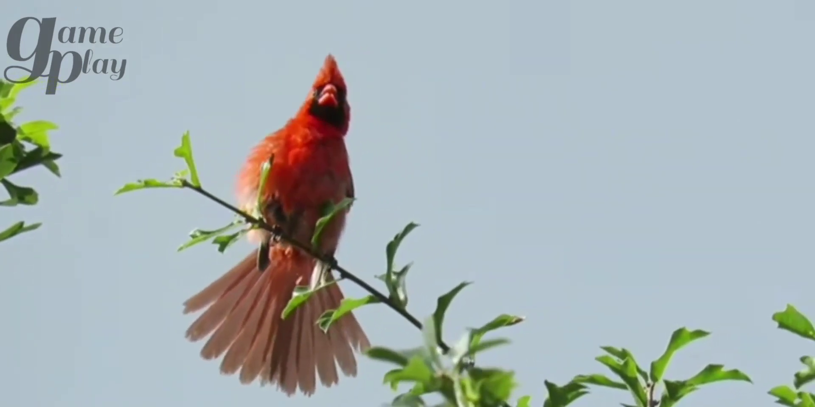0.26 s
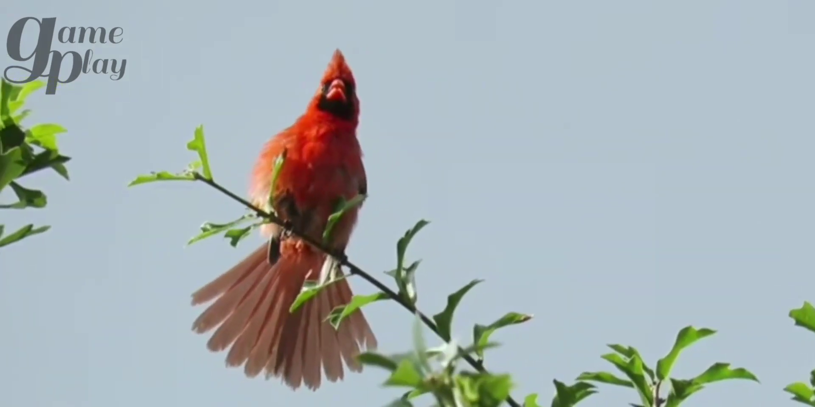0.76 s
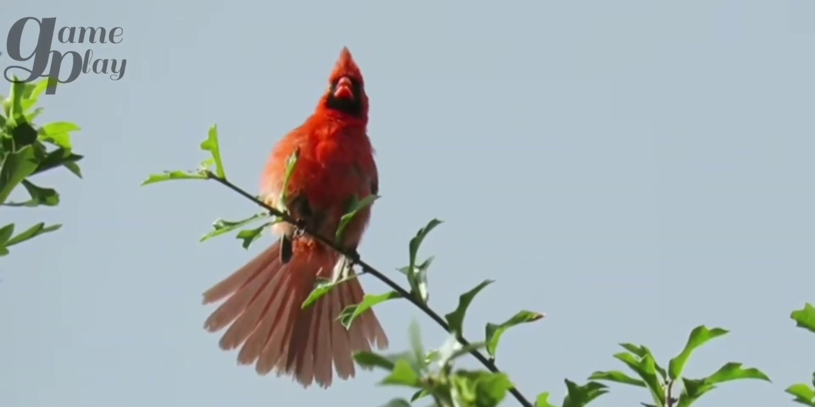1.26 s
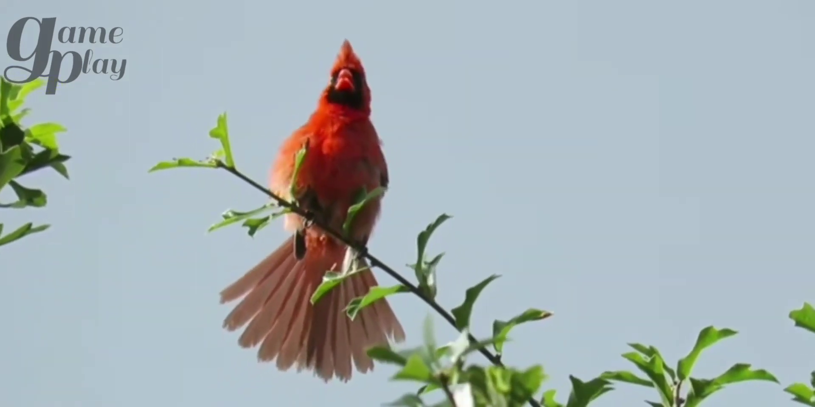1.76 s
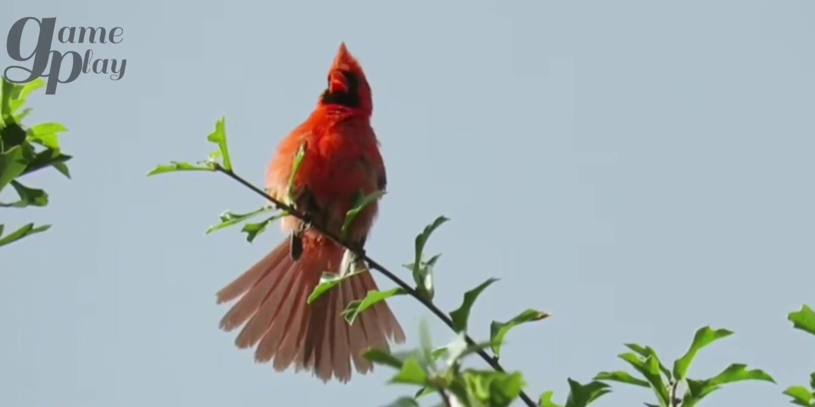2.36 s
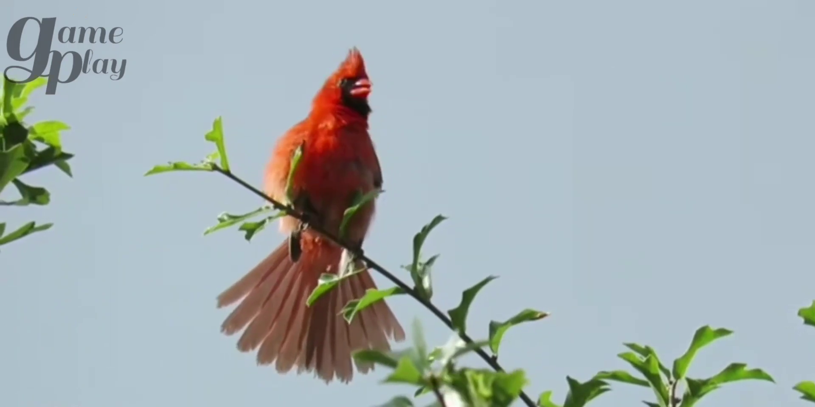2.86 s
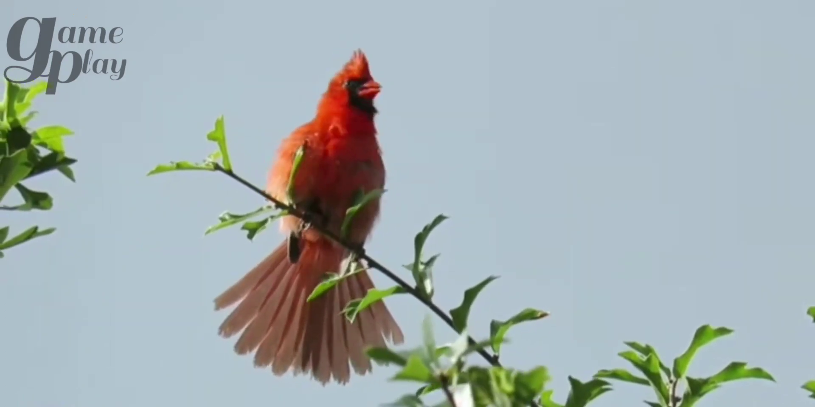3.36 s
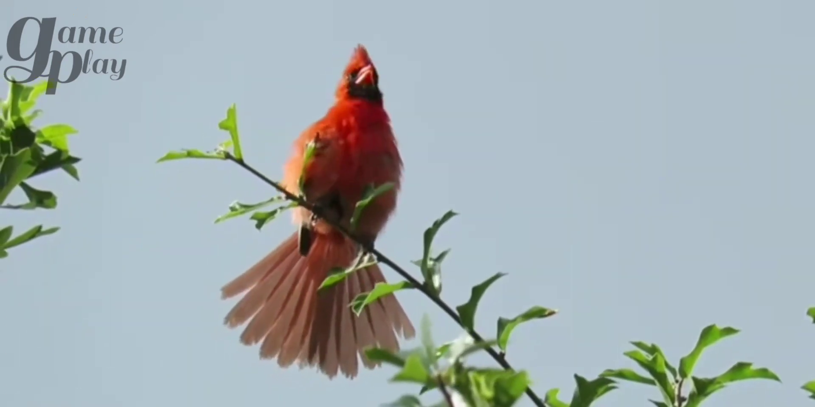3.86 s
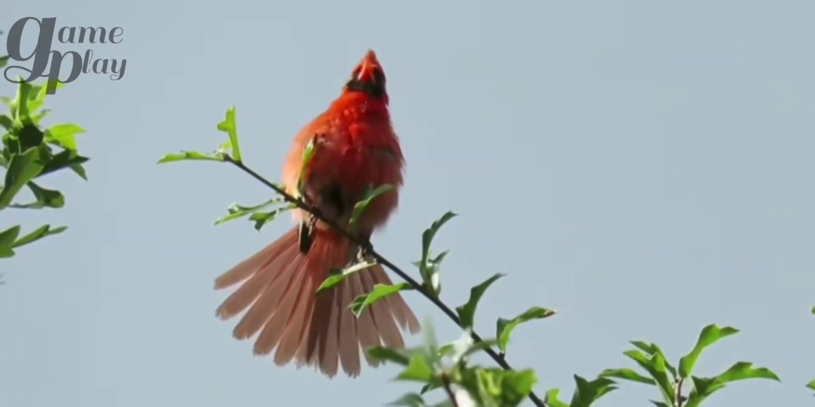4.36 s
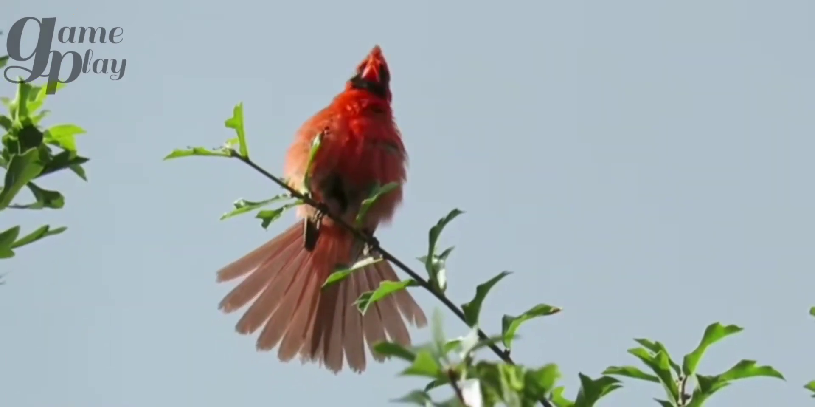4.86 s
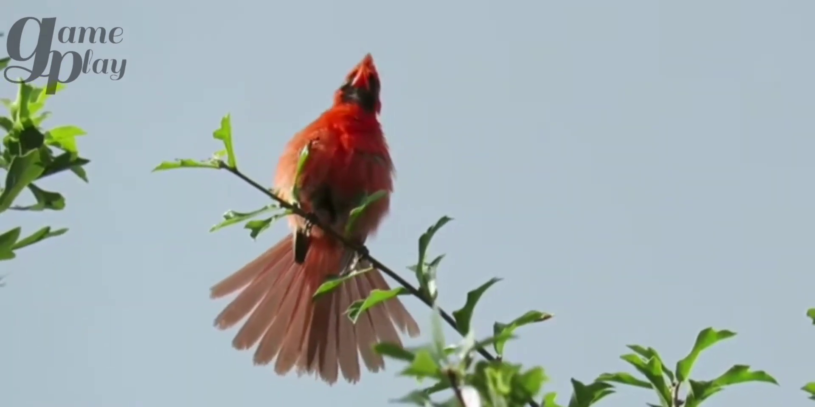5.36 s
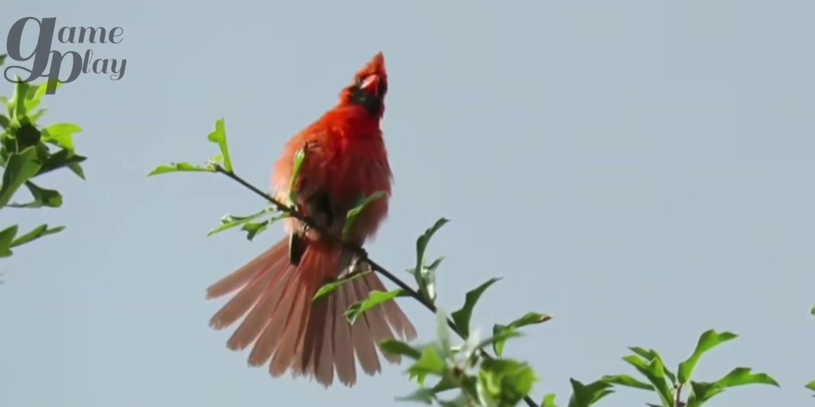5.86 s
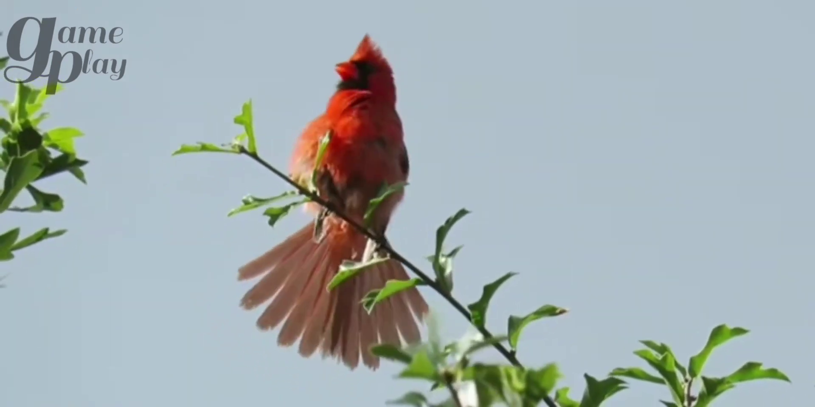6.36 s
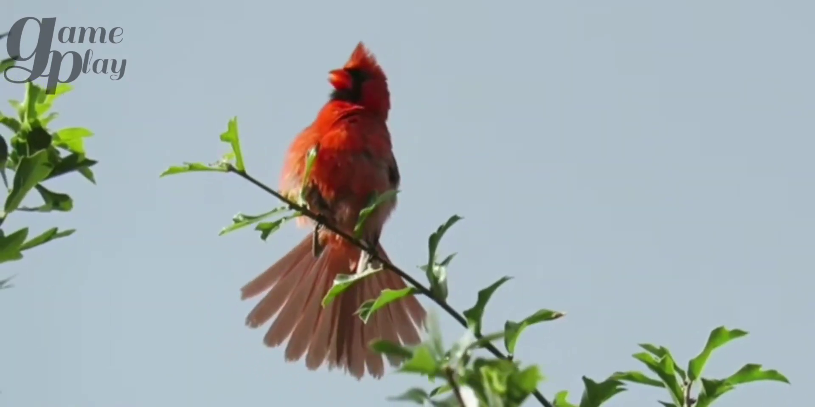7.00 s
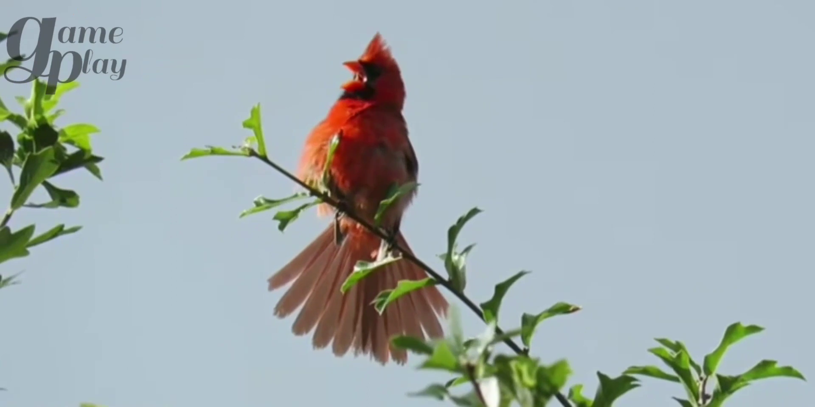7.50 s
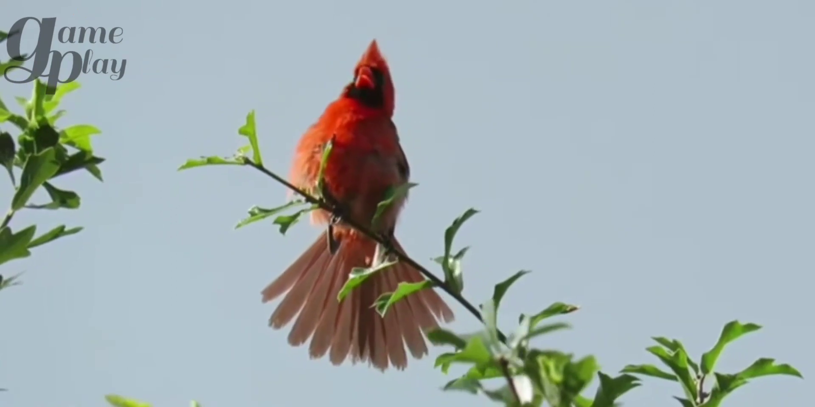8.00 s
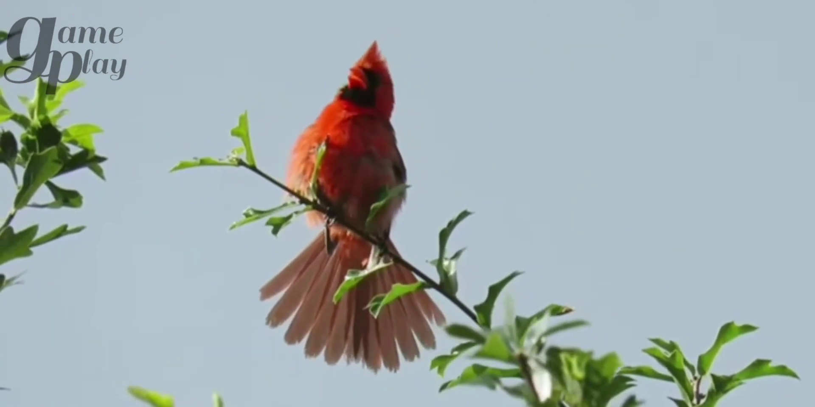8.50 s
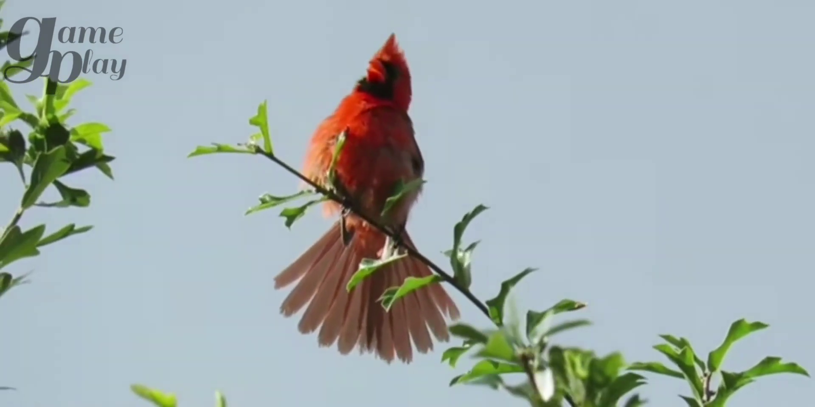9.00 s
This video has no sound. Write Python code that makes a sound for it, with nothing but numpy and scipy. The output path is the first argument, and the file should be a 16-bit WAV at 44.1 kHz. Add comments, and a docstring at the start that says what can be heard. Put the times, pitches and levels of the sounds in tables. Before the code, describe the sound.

A cardinal repeats quick chirps and down-slurred whistles from a treetop amid constant shrill insect hiss; a faint trill and distant cardinal follow.

```python
"""Throughout, traffic rumbles far off, air stirs the leaves (all coloured noise) and cicadas buzz (ringing clicks).
Early on, other birds whistle: gliding sines. Then a cardinal sings from a treetop on a summer day: quick high
chirps and long falling slurs, both sines, echoed by the trees; the ground echoes its slurs, branches its chirps.
Meanwhile a far animal trills (pulsed noise in a throat) and a far cardinal answers; late on, birds whistle again.
Both channels are the same, as from a mono microphone."""
import sys
import numpy as np
from scipy import signal
from scipy.fft import rfft, irfft, next_fast_len
from scipy.io import wavfile
from scipy.ndimage import uniform_filter1d, map_coordinates

SR = 44100
rng = np.random.default_rng(int(sys.argv[2]) if len(sys.argv) > 2 else 0)


def generate_wav(signal):
    """Clip the signal to [-1, 1] and save it as 16-bit WAV at the path in sys.argv[1]."""
    frames = np.transpose(np.atleast_2d(signal))
    scaled = np.clip(frames, -1, 1) * 32767
    pcm = np.round(scaled).astype(np.int16)
    wavfile.write(sys.argv[1], SR, pcm)


N = 407484  # length in samples


def amp(db):
    """Turns dB into a plain factor."""
    return 10 ** (np.asarray(db) / 20)


def unit(x):
    """Scales x to an rms of 1."""
    return x / np.sqrt(np.mean(x ** 2) + 1e-20)


def along(points, hz):
    """Reads a curve of (Hz, value) points on a log pitch axis."""
    f, v = np.transpose(points)
    return np.interp(np.log(hz + 1), np.log(f + 1), v)


def wobble(rate):
    """A smooth random curve with rate random points a second."""
    points = rng.standard_normal(int(N * rate / SR) + 4)
    return map_coordinates(points, [np.arange(N) * rate / SR])


def spell(start, stop, edge, db):
    """A level change in dB that sets in, holds and goes back; times in seconds."""
    t = np.arange(N) / SR
    return db * np.clip(np.minimum(t - start, stop - t) / edge + .5, 0, 1)


def filtered(x, response):
    """Multiplies the spectrum of x by a response that depends on frequency."""
    m = next_fast_len(N + SR // 2)
    return irfft(rfft(x, m) * response(np.fft.rfftfreq(m, 1 / SR)), m)[..., :N]


def resonances(modes):
    """Response of a few resonances, added with alternating sign; modes are (Hz, width in Hz, dB)."""
    def response(f):
        total = 0
        for k, (center, width, db) in enumerate(modes):
            ring = 1j * f * width / (center * center - f * f + 1j * f * width)
            total = total + (-1) ** k * amp(db) * ring
        return total
    return response


def patchy(x, patchy_db):
    """Gives x patches of random gain in time and frequency."""
    z = signal.stft(x, nperseg=512)[2]
    field = uniform_filter1d(rng.standard_normal(z.shape), size=3, axis=0)
    field = uniform_filter1d(field, size=5, axis=1)
    return signal.istft(z * amp(patchy_db * unit(field)), nperseg=512)[1][:N]


def rush(spectrum, patchy_db):
    """Patchy noise of rms 1, coloured by a curve of (Hz, dB)."""
    noise = patchy(rng.standard_normal(N), patchy_db)
    return unit(filtered(noise, lambda hz: amp(along(spectrum, hz))))


def add(track, s, hz, db):
    """Adds a sine at s seconds, its pitch and rms level given for every sample."""
    phase = 2 * np.pi * np.cumsum(hz) / SR
    track[round(s * SR):][:len(hz)] += np.sqrt(2) * amp(db) * np.sin(phase)


def traffic():
    """Far traffic is a deep rumble and a higher road noise, both coloured noise."""
    # Colour of the rumble. Each row: frequency in Hz, relative level in dB per Hz.
    rumble_color = [(13, -49), (22, -34), (60, -6), (114, 0), (156, -2.5), (230, -8.5), (275, -14),
                    (330, -14.5), (430, -40), (730, -120)]
    # Colour of the road noise. Each row: frequency in Hz, relative level in dB per Hz.
    road_color = [(40, -26), (130, -12.5), (270, -6), (400, -4.5), (620, -2), (800, -2.5), (950, -4.5),
                  (1150, -10), (1600, -14.5), (2100, -21.5), (3500, -120)]
    # the rumble drops for about a second
    rumble_db = -48 + spell(6.24, 7.28, edge=.06, db=-7)
    road_db = -52 + 0.214 * np.arange(N) / SR  # rises slowly, in dB per second
    rumble = amp(rumble_db) * rush(rumble_color, patchy_db=0.6)
    return rumble + amp(road_db) * rush(road_color, patchy_db=1.75)


def engines():
    """Notes of far passing engines: sines with soft ends and a slightly drifting pitch."""
    # Each row: start in seconds, end in seconds, middle pitch in Hz, level in dB.
    notes = [(.4, 1.2, 108.2, -53.5), (2.3, 4.3, 588, -63.5), (3.6, 4.14, 109.8, -53),
             (4.1, 4.95, 219.3, -53.5), (5, 6.6, 609, -61.5), (5.7, 6.046, 400.1, -59.5),
             (6.3, 7.4, 515, -65), (7.45, 8, 215, -56), (7.9, 8.9, 110, -53.5), (7.2, 9.2, 667, -66)]
    track, drift = np.zeros(N), wobble(6)
    for start, stop, hz, db in notes:
        u = np.linspace(0, 1, round((stop - start) * SR))
        swell_db = 20 * np.log10(np.sin(np.pi * u) ** 0.21 + 1e-4)
        drifting_hz = hz * (1 + 0.00437 * drift[round(start * SR):][:len(u)])
        add(track, start, drifting_hz, db + swell_db)
    return track


def leaves():
    """Air in the leaves makes patchy noise that slowly changes in level."""
    # Strength over time. Each row: time in seconds, level in dB.
    strength = [(0, -59.5), (3, -62), (5, -58), (8, -59), (9.24, -59.5)]
    # Colour of the rustle. Each row: frequency in Hz, relative level in dB per Hz.
    leaf_color = [(800, -49), (1300, -1.5), (1700, -9), (2200, -4.5), (2600, -4.5), (3000, -6.5),
                  (4000, -9), (5000, -10.5), (6000, -7), (7000, -4.5), (9000, -46), (15000, -120)]
    s, db = np.transpose(strength)
    level_db = np.interp(np.arange(N) / SR, s, db)
    return amp(level_db) * rush(leaf_color, patchy_db=3.5)


def cicadas():
    """Countless clicks of the tymbals (drum skins in the body) ring one main resonance."""
    # Resonances before cubing. Each row: frequency in Hz, width in Hz, relative level in dB.
    tymbal = [(8068, 1296, 1.5), (7090, 480, -18)]
    clicks = rng.standard_normal(N) * (rng.random(N) < .3)
    ring = resonances(tymbal)
    # cubed for the drum, the air sac and the spread of sizes
    buzz = unit(filtered(patchy(clicks, patchy_db=1.55), lambda f: ring(f) ** 3))
    level_db = -36 + 0.23 * wobble(12) + 0.56 * wobble(28)
    return amp(level_db) * buzz


def hissing_insects():
    """Other insects hiss above the cicadas: a broad noise and a thin one."""
    # Colour of the broad hiss. Each row: frequency in Hz, relative level in dB per Hz.
    broad_color = [(7000, -39), (8800, -22), (9150, -17), (9400, 0), (9850, -2.5), (10300, 0), (12000, 0),
                   (13400, -3), (14400, -10), (15000, -20), (15700, -12.5)]
    # Colour of the thin hiss. Each row: frequency in Hz, relative level in dB per Hz.
    thin_color = [(12800, -26), (13500, -21), (13900, 8), (14400, -10), (15000, -15)]
    broad_db = -43.5 + 0.11 * wobble(18) + 0.22 * wobble(30)
    thin_db = -61.5 + spell(4.9, 8.55, edge=.6, db=6)  # stronger for a while
    broad = amp(broad_db) * rush(broad_color, patchy_db=1.75)
    return broad + amp(thin_db) * rush(thin_color, patchy_db=3.0)


def trill():
    """A far animal puffs noise through a small throat, ever slower, blurred by distance."""
    # Throat resonances. Each row: frequency in Hz, width in Hz, relative level in dB.
    throat = [(2410, 250, 9), (1880, 170, -14), (2980, 600, -10), (3830, 130, 4)]
    count_s = 4.575  # a puff early in the swell, from which the slowing is counted
    full_s, end_s = 5.2, 7.24  # full strength, start of the fade
    fast_per_s, slow_per_s, tires_s = 24.6, 16.5, .69  # the puff rate relaxes from fast to slow
    t = np.arange(N) / SR
    tiring = tires_s * (1 - np.exp(np.minimum(count_s - t, 1) / tires_s))
    beat = slow_per_s * (t - count_s) + (fast_per_s - slow_per_s) * tiring
    puffs = (.5 + .5 * np.cos(2 * np.pi * beat)) ** 2.6
    puffs = puffs * amp(1.6 * wobble(14)) + 0.08  # the blur fills the gaps a little
    # rises by 13 dB per second, then sags by .5 dB per second
    level_db = -60 + np.minimum(13 * (t - full_s), .5 * (full_s - t))
    level_db = level_db - 60 * np.maximum(t - end_s, 0) / 0.44  # fades by 60 dB in 0.44 s
    return amp(level_db) * unit(filtered(puffs * rng.standard_normal(N), resonances(throat)))


def whistles():
    """Other birds: soft-edged gliding notes that flutter on their long way through the leaves."""
    # Each row: start in seconds, length in seconds, first pitch in Hz, last pitch in Hz,
    # level in dB before the flutter.
    notes = [(1.762, .05, 2956, 2930, -68), (1.835, 0.051, 2957, 2920, -63), (3.0, .12, 2720, 2640, -70),
             (7.762, .045, 2684, 2760, -57), (7.805, 0.17, 2610, 2590, -63.5),
             (7.932, 0.076, 2670, 2675, -52.5), (7.942, 0.105, 2500, 2590, -58),
             (8.002, 0.041, 2620, 2554, -46.5), (8.03, .027, 2620, 2360, -52),
             (8.062, .07, 2600, 2620, -70)]
    track = np.zeros(N)
    for s, length, first_hz, last_hz, db in notes:
        u = np.linspace(0, 1, round(length * SR))
        edge_db = 20 * np.log10(np.sin(np.pi * u) ** .5 + 1e-4)
        add(track, s, first_hz + (last_hz - first_hz) * u, db + edge_db)
    return track * amp(3.3 * wobble(110))


def answer():
    """A far cardinal with the same kind of syllable, wavering over the distance."""
    return (chirps("far", swell_db=3.5) + slurs("far")) * amp(3.5 * wobble(90))


def chirps(singer, swell_db):
    """One side of the syrinx (voice organ): plunge, hold with a brief dip, level change and drop."""
    # Each row: start in seconds, level in dB before shaping, held pitch in Hz, height of the plunge
    # above it in Hz, attack in seconds, time of the dip after the start in seconds, singer.
    notes = [(3.337, -50.5, 3510, 2, 0.019, .0215, "near"), (3.799, -41.5, 3455, 598, .004, 0.011, "near"),
             (4.225, -39.5, 3460, 501, 0.0045, 0.019, "near"),
             (4.662, -36.5, 3400, 650, 0.0065, 0.015, "near"),
             (5.078, -36.5, 3450, 800, .005, 0.018, "near"),
             (5.49, -38.5, 3430, 749.5, .004, 0.017, "near"),
             (5.885, -36.5, 3526, 900, .008, 0.023, "near"), (6.52, -63, 3420, 300, .006, .02, "far"),
             (6.94, -61, 3420, 298.5, .006, 0.023, "far"), (7.348, -58, 3420, 301.5, .006, 0.016, "far")]
    plunge_s, sag_hz_per_s = .0022, 2000  # settles on the held pitch, which sags a little
    drop_s, drop_hz_per_s = .0205, 23000  # then the pitch drops away
    track, t = np.zeros(N), np.arange(-.03, .05, 1 / SR)
    for s, db, held_hz, plunge_hz, attack, dip, who in notes:
        if who != singer:
            continue
        above_hz = plunge_hz * np.exp(np.minimum(-t / plunge_s, 2))
        hz = held_hz + above_hz - sag_hz_per_s * np.maximum(t, 0)
        hz = hz - drop_hz_per_s * np.maximum(t - drop_s, 0)
        attack_db = 15 * np.minimum(t / attack - .5, 0)
        release_db = -60 * np.maximum(t - .032, 0) / .014  # 60 dB fade in .014 s
        # the level swells (or fades) early in the drop
        change_db = swell_db * np.exp(-((t - 0.023) / 0.0039) ** 2)
        dip_db = -13 * np.exp(-((t - dip) / 0.0023) ** 2)
        height_db = -6 * above_hz / 1000  # fainter the higher above the held pitch
        add(track, s + t[0], hz, db + attack_db + release_db + change_db + dip_db + height_db)
    return track


def slurs(singer):
    """The other side of the syrinx: a steady fall that weakens as it sinks; some break off early."""
    # Each row: start in seconds, level in dB before shaping, fall in octaves per second, time of
    # breaking off in seconds, overtone level in dB before the bill acts, singer.
    notes = [(3.388, -52, 2.3, .128, -9, "near"), (3.854, -45, 2.85, .13, -29.5, "near"),
             (4.275, -42.5, 3.0, .2, -34, "near"), (4.711, -40.5, 3.07, .21, -34, "near"),
             (5.129, -39.5, 3.2, 0.19, -34, "near"), (5.537, -39, 3.25, 0.2, -30, "near"),
             (5.932, -39, 3.2, 0.135, -36, "near"), (6.57, -62, 3.4, .1, -40, "far"),
             (7.0, -63, 4.2, .11, -40, "far"), (7.41, -61.5, 3.9, 0.058, -38, "far")]
    first_hz, hook_hz, hook_s = 2150, 90.4, 0.00417  # a short hook leads into the fall from above
    bill_hz, bill_width_hz = 3600, 350  # the open bill favours overtones near here
    track, t = np.zeros(N), np.arange(-.008, .27, 1 / SR)
    for s, db, fall, cut, overtone_db, who in notes:
        if who != singer:
            continue
        hz = first_hz * 2 ** (-fall * t) + hook_hz * np.exp(-t / hook_s)
        # the voice thins out below 1850 Hz by 44 dB per octave, 16 dB at most
        weak_db = np.clip(44 * np.log2(hz / 1850), -16, 0)
        attack_db = 15 * np.minimum(t / 0.0027 - 1, 0)
        release_db = -60 * np.maximum(t - cut, 0) / 0.016  # 60 dB fade in 0.016 s
        level_db = db + weak_db + attack_db + release_db
        bill_db = -6 * ((2 * hz - bill_hz) / bill_width_hz) ** 2
        add(track, s + t[0], hz, level_db)
        add(track, s + t[0], 2 * hz, level_db + overtone_db + bill_db)
    return track


def branches(x):
    """Nearby branches throw back weak copies within 25 ms, in a new spray every 0.4 s."""
    out, step = np.zeros(N + SR), round(.4 * SR)
    for start in range(round(.1 * SR), N, step):
        spray = np.zeros(SR // 20)
        delays_s = rng.uniform(.002, .025, size=9)
        spray[(delays_s * SR).astype(int)] = rng.standard_normal(9)
        part = signal.fftconvolve(x[start:start + step], spray)
        out[start:][:len(part)] += part
    return out[:N]


def cardinal():
    """The near singer: slurs by way of the ground, chirps by way of branches; and what the trees get."""
    ground_s = .0043  # extra travel time by way of the ground
    high, low = chirps("near", swell_db=7), slurs("near")
    aside = chirps("near", swell_db=-10)  # toward the trees the drop fades instead of swelling
    # the copy off the ground weakens some pitches, so each slur dips and swells as it falls
    grounded = filtered(low, lambda f: 1 + 0.57 * np.exp(-2j * np.pi * f * ground_s))
    high = high + amp(-20) * branches(aside)
    # air in motion makes the level flutter
    near = high * amp(2.0 * wobble(160)) + grounded * amp(.8 * wobble(60))
    return near, aside + amp(-6) * low


def trees(x):
    """Tree crowns scatter sound: each frequency dies at its own speed; moving leaves change the tail."""
    # Each row: frequency in Hz, time to fade by 60 dB in seconds.
    fade_times = [(1200, 0.41), (2200, 0.9), (3400, 0.47), (5000, 0.78)]
    wet, step = np.zeros(N + SR), SR // 5  # a new tail every 0.2 s
    for start in range(0, N, step):
        piece = x[start:start + step]
        noise = rng.standard_normal(SR // 2)
        if np.abs(piece).max() < 1e-5:  # nothing to echo
            continue
        hz, t, z = signal.stft(noise, SR, nperseg=256)
        # high pitches scatter more, by 4.3 dB per octave
        tilt_db = 4.3 * np.log2(np.clip(hz, 500, 5000) / 5000)[:, None]
        fade_db = -60 * t / along(fade_times, hz)[:, None]
        tail = signal.istft(z * amp(tilt_db + fade_db), SR, nperseg=256)[1]
        part = signal.fftconvolve(piece, tail / np.linalg.norm(tail))
        wet[start + 300:][:len(part)] += part  # 300 samples: about 7 ms later
    return wet[:N]


def scene():
    """Adds all sources and the echoes from the trees, the same in both channels."""
    background = traffic() + engines() + leaves()
    insects = cicadas() + hissing_insects()
    calls, others, far = trill(), whistles(), answer()
    near, aside = cardinal()
    echoes = trees(aside + amp(2) * far + amp(-10) * others + amp(-5) * calls)
    mix = background + insects + calls + others + far + near + echoes
    return np.array([mix, mix])


def record(dry):
    """The recorder keeps nothing from its band limit of 15650 Hz upward."""
    return filtered(dry, lambda hz: hz < 15650)


dry = scene()
out = record(dry)
generate_wav(out)
```